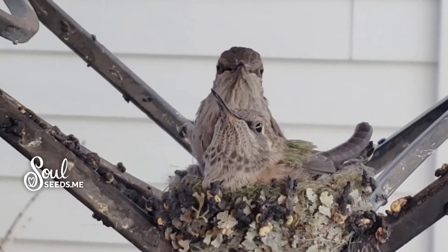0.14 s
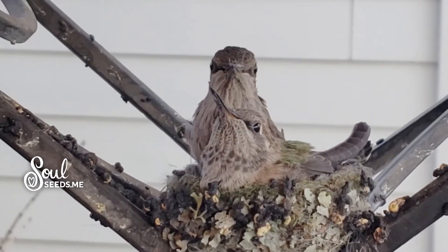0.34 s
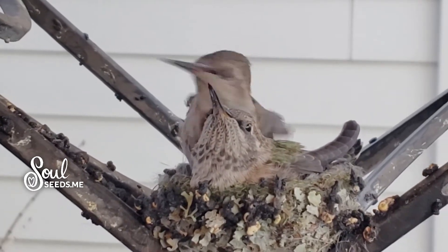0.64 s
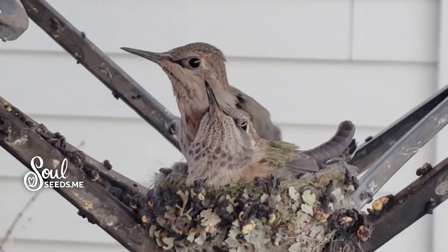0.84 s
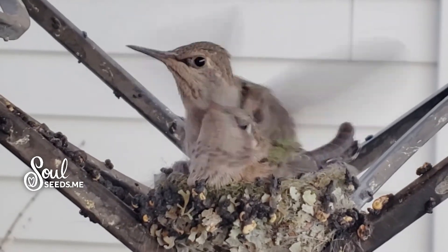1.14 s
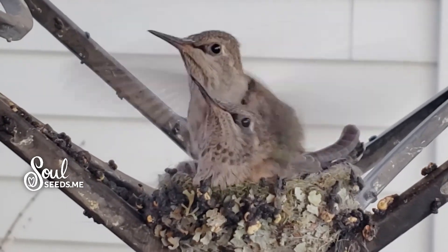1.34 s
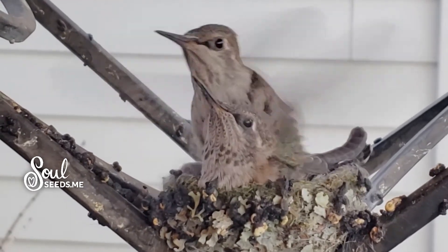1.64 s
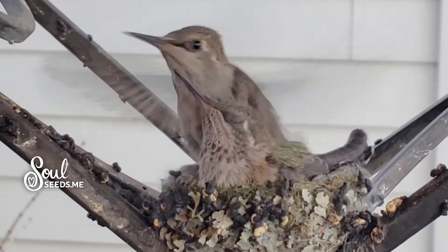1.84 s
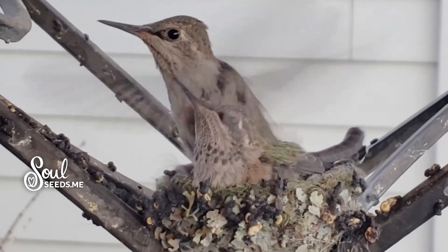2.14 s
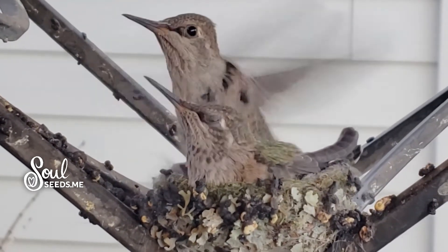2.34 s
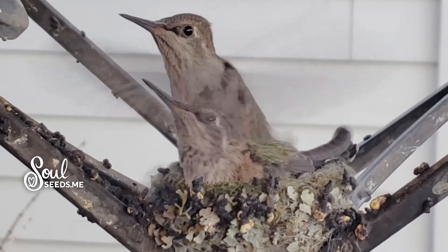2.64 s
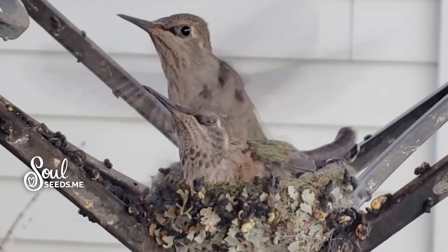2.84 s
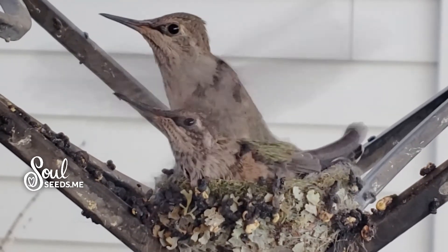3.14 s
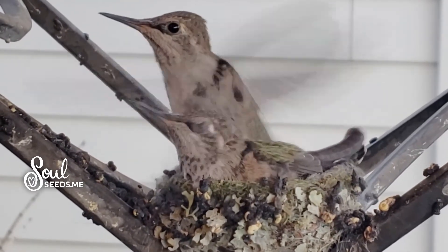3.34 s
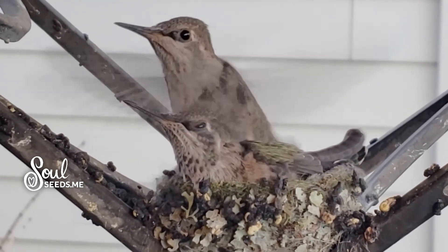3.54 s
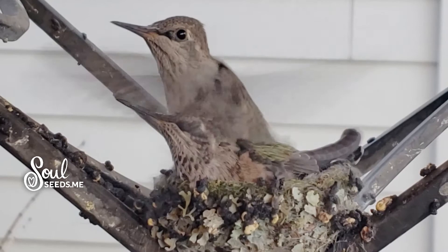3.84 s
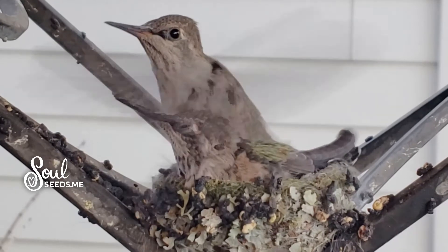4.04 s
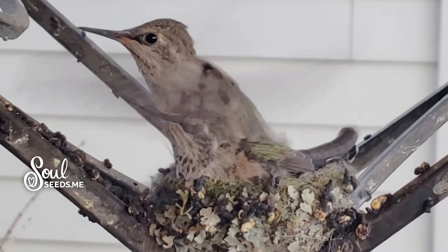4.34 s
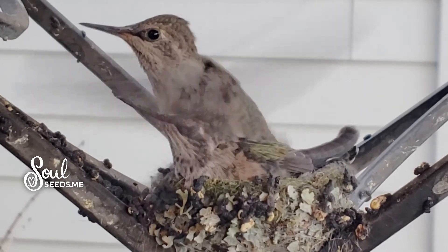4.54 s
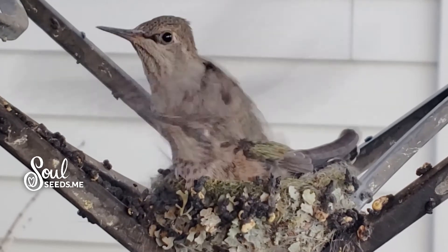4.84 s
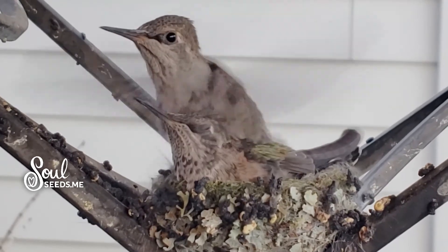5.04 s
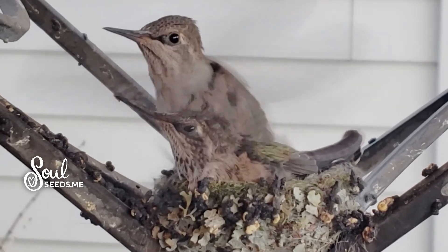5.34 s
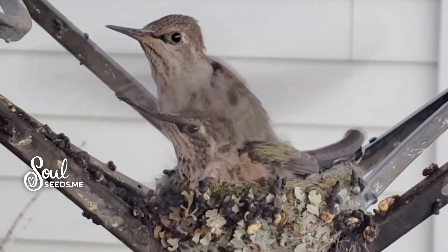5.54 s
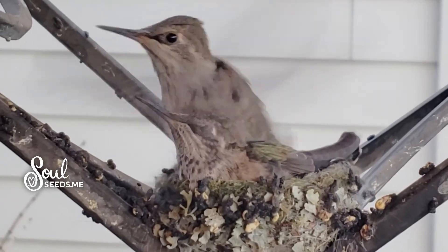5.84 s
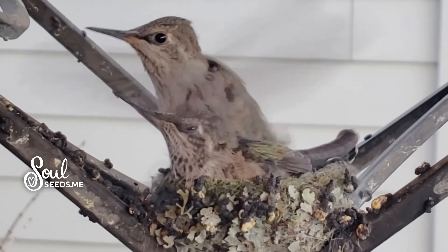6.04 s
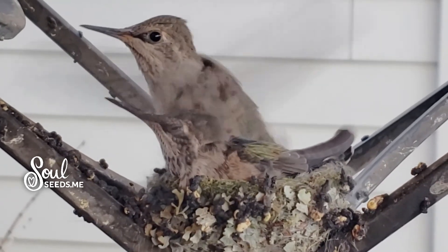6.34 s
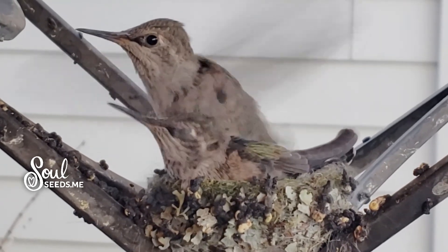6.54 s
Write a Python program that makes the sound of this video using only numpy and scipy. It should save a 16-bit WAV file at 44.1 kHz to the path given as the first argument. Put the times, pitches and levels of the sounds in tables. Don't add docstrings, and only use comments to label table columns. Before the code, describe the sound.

A quiet outdoor stereo scene beside a house wall, heard about a metre from a nest. Soft low town noise and a wavering fan hum run throughout. Two weak, tiny chirps come at 0.2 and 0.7 seconds, while a distant songbird whistles three descending notes from 0.8 to 1.2. From about 1.05 a chick's wings start a low purring whir, roughly forty beats a second, with faint airy hiss, lasting to the end. Brighter millisecond-short chirps, dropping steeply from very high, come paired at 1.7, near 2.2 and 2.75, then singly at 3.5, 4.2, 4.8 and 5.9. Dry bill ticks and shuffling cluster from 2.7 to 3.6; sharper ticks come at 4.9, 5.8 and 6.6. Bassy wind thumps are strongest at 3.2-3.8, mainly right, as a far vehicle's noise swells gently. A faint motor whine rises at 4.9-5.2. Chirps carry a short wall echo.

```python
import sys
import numpy as np
from scipy import signal
from scipy.fft import rfft, irfft
from scipy.io import wavfile
from scipy.ndimage import uniform_filter1d

SR = 44100
rng = np.random.default_rng(int(sys.argv[2]) if len(sys.argv) > 2 else 0)


def master_out(mix):
    frames = np.transpose(np.atleast_2d(mix))
    ceiling = np.clip(frames, -1, 1)
    pcm = np.round(ceiling * 32767).astype(np.int16)
    wavfile.write(sys.argv[1], SR, pcm)


def invert_db(level):
    return 10 ** (np.asarray(level, dtype=float) / 20)


N = 294588
TIME = np.arange(N) / SR
FREQ = np.maximum(np.fft.rfftfreq(N, 1 / SR), 1)

# (frequency [Hz], density [dB per Hz])
TOWN_SPECTRUM = [(25, -19.5), (50, -11.5), (110, -5.5), (260, -13.5), (400, -18), (780, -21), (1100, -37),
                 (1800, -35), (2150, -45), (2800, -41), (3500, -44), (8500, -51), (13000, -48.5),
                 (16000, -52)]
TOWN_DB = -62
# (frequency [Hz], likeness [0-1])
PORT_LIKENESS = [(60, 1), (300, 0.51), (700, 0.07), (1500, 0), (3000, 0.03), (7000, 0.15), (15000, .01)]
# (frequency [Hz], left minus right [dB])
PORT_TILT = [(60, -10.5), (110, -7.5), (200, -9.5), (380, -7), (700, -0.5), (1290, -6.0), (2380, -11),
             (4400, -2), (8120, -3.5), (15000, -9.5)]
# (frequency [Hz], level [dB])
FAN_LINES = [(59.2, -63), (107.7, -61), (193.8, -69), (215.3, -65.5), (249, -67.5), (301.5, -74),
             (345, -75), (409.1, -79)]
TRAFFIC_S, TRAFFIC_WIDTH_S, TRAFFIC_DB, QUIET_DB = 3.14, 1.1, 5, -1
# (time [s], width [s], low-mid lift [dB], mid lift [dB])
SCUFFLES = [
    (2.92, 0.11, -0.5, 6.5),
    (3.48, 0.13, 2, 5),
]

# (middle [s], length [s], level [dB], left minus right [dB])
GUSTS = [
    (0.147, 0.29, -52, 7),
    (1.46, 0.39, -49.5, -16),
    (1.679, 0.14, -44.5, -1),
    (3.486, 0.58, -39.5, -18.5),
    (4.356, 0.23, -50, -4),
    (5.035, 0.32, -47.5, -1),
    (5.85, 0.57, -53, -6),
    (6.6, 0.33, -48, 2),
]
CALM_DB, CALM_PAN_DB, GUST_EDGE_S = -61, -5, .06
# (time [s], level [dB], frequency [Hz], port [0 left, 1 right])
BUFFETS = [(0.101, -41.5, 56, 1), (0.266, -38.5, 68, 1), (0.851, -39, 73.4, 1), (1.12, -37.5, 75, 1),
           (1.376, -35, 76, 1), (1.47, -34, 71.5, 1), (1.584, -34.5, 76, 1), (1.586, -38.5, 55.6, 0),
           (1.694, -41, 78, 1), (1.695, -38.5, 77.5, 0), (3.174, -37, 91, 1), (3.206, -41, 58.5, 1),
           (3.311, -25, 88.9, 1), (3.366, -22, 50.6, 1), (3.4, -25, 73, 1), (3.465, -23, 58.6, 1),
           (3.501, -26, 90, 1), (3.561, -20, 68.5, 1), (3.682, -23.5, 86, 1), (3.76, -32.5, 62.1, 1),
           (4.376, -45, 66.26, 0), (5.059, -37.5, 89, 1), (5.293, -35.5, 62.6, 1), (5.399, -37.5, 75, 0),
           (5.644, -32, 77.34, 1), (5.843, -34, 64, 1), (6.304, -38, 66.6, 1), (6.354, -38.5, 52.5, 1),
           (6.52, -45, 65.6, 0)]

# (time of bend [s], held pitch [Hz], hold [ms], fall [Hz per ms], level [dB])
CHIRPS = [(0.176, 6160, 3.9, 990, -54), (0.742, 6830, 3.1, 850, -51), (1.7027, 8680, 8.2, 964, -39.5),
          (1.78, 8120, 6.9, 733, -40), (2.175, 7540, 6.4, 647, -45.5), (2.2603, 7630, 4.55, 730, -40),
          (2.7241, 8100, 6.9, 729.5, -35.5), (2.8031, 8373, 5.4, 755, -35), (3.5117, 8400, 6.5, 920, -33.5),
          (4.182, 8690, 8.5, 901, -35), (4.7973, 8700, 6.7, 926, -35), (5.8943, 8732, 5.8, 930, -32.5)]
BEND_MS, SWELL_DB, FADE_DB_PER_MS, CHIRP_END_HZ = 1.118, 17, 2.33, 1680
OCTAVE_DB, RASP = -11, .17
OCTAVE_END_HZ, OCTAVE_FADE_HZ = 4000, 1390
CHIRP_PAN_DB, PAN_PER_DB = 1.2, -0.03
# (time [s], ring [dB], knock and treble against the ring [dB], left minus right [dB])
SNAPS = [(0.176, -65.5, -4, 3), (0.742, -67, -9, 7), (3.5125, -52, -1.5, 0.5), (2.0252, -59, -23, 0),
         (2.3547, -72, -7, -3), (2.6663, -42.5, -13, 6), (2.7979, -39.5, -24.5, 0), (2.902, -70, 6, -2),
         (2.9275, -60, 2, 5), (2.9536, -47.5, 1, 5.5), (2.982, -56.5, 1, 9), (3.379, -55, 11, 5.5),
         (3.4057, -54, 13, 1.5), (3.4186, -57.5, 1, 21), (3.4335, -53, -15, 13), (3.4594, -55, -5, 7),
         (3.5407, -54, -8, 3), (3.621, -49, -12, 8), (3.649, -65.5, 0, -1), (4.1345, -81, -4, 0),
         (4.8997, -30.5, -40.5, 8), (5.7335, -59, -13, 6), (5.7604, -42.5, -35, 4.5), (5.8709, -35, -27, 7),
         (6.4722, -64, -8, 6), (6.5843, -26, -55, 7), (6.598, -73, -12, -1)]
# (frequency [Hz], bandwidth [Hz], level [dB])
BILL_MODES = [(2580, 1300, -56), (5200, 2800, -2), (8470, 610, 9), (11400, 7200, 24.5), (16000, 1300, -10)]
TREBLE_DB, TREBLE_PER_BREADTH = -2, 0.56
# (delay [ms], level [dB])
ECHOES = [(4.3, -13), (9.5, -18), (15, -21)]
# (frequency [Hz], decay time t60 [s], level [dB])
YARD = [(1240, 0.44, -19.5), (2680, 0.25, -11.5), (4580, 0.3, -19), (7300, 0.29, -28), (12400, 0.23, -6)]
FAR_WET_DB, SNAP_WET_DB = -2, -5

# (time [s], frequency [Hz], level [dB])
SONG = [
    [(.77, 4850, -80), (.80, 4700, -70), (.825, 4580, -65), (.85, 4480, -71), (.89, 4400, -86)],
    [(.862, 7830, -92), (.872, 7000, -75), (.885, 6250, -71), (.9, 5750, -72), (.92, 5350, -73),
     (.95, 5000, -72), (.975, 4850, -75), (1.0, 4750, -88)],
    [(1.008, 4530, -80), (1.04, 4490, -71), (1.1, 4400, -65), (1.185, 4240, -66), (1.2, 4220, -78),
     (1.215, 4190, -77), (1.23, 4170, -92)],
]
SONG_ROUGH = [.92, .7, .15]

# (time [s], beat rate [beats per s], level [dB])
WING = [(1.05, 43, -71), (1.2, 43.2, -60), (1.5, 42.5, -58), (1.85, 40.2, -52.5), (2.1, 39.6, -50),
        (2.7, 38.6, -52), (3.2, 37.6, -52.5), (3.9, 35.9, -54), (4.15, 35.8, -57.5), (4.5, 35.8, -53.5),
        (5.4, 35.7, -56.5), (6.0, 36, -53), (6.68, 34.4, -54)]
# (multiple [-], level [dB])
STROKE = [(1, -10), (2, -1), (3, 0), (4, -14), (5, -11), (6, -14), (7, -17), (8, -16), (9, -15), (10, -21),
          (11, -24), (12, -23)]
REST_DB = -75
FEATHER_DB, FEATHER_PER_DB, STIR_PER_DB = -88.5, 0.6165, 0.224

# (time [s], frequency [Hz], level [dB])
PASSER = [(4.88, 750, -90), (4.92, 770, -71), (5.0, 800, -73), (5.1, 840, -78), (5.2, 870, -92)]
# (frequency [Hz], left [dB], right [dB], left lag [rad])
PORTS = [(800, 1, 2, .05), (1500, -4, 2, .1), (2200, -11, -2, .05), (3200, -5, -4, .2), (5000, 3, 2, .5),
         (6400, -2.5, -3.5, .8), (7700, 3, 2, 1.5), (8600, -3, -3, 1.8), (9600, -4, -1, 2.2),
         (12000, -2, 1, 2.1), (15500, -2, 0, 2.4)]


def curve(rows, column):
    rows = np.array(rows, float)
    return np.interp(TIME, rows[:, 0], rows[:, column])


def shape(rows, column=1):
    rows = np.array(rows, float)
    return np.interp(np.log(FREQ), np.log(rows[:, 0]), rows[:, column])


def band(hz, octaves):
    return np.exp(-.5 * (np.log2(FREQ / hz) / octaves) ** 2)


def noise(gain):
    x = irfft(rfft(rng.standard_normal(N)) * gain, N)
    return x / x.std()


def walk(rate_hz):
    return noise(1 / (1 + (FREQ / rate_hz) ** 2))


def bump(s, width_s):
    return np.exp(-.5 * ((TIME - s) / width_s) ** 2)


def place(x, pan_db):
    return np.array([x * invert_db(pan_db / 2), x * invert_db(-pan_db / 2)])


def swells():
    low = QUIET_DB + TRAFFIC_DB * bump(TRAFFIC_S, TRAFFIC_WIDTH_S)
    mid = STIR_PER_DB * (curve(WING, 2) - REST_DB)
    for s, width_s, low_db, mid_db in SCUFFLES:
        shuffle = bump(s, width_s)
        low = low + low_db * shuffle
        mid = mid + mid_db * shuffle
    return low, mid


def town_noise():
    like = np.clip(shape(PORT_LIKENESS), 0, 1)
    colour = invert_db(shape(TOWN_SPECTRUM))
    unit = invert_db(TOWN_DB) / np.sqrt(np.sum(colour[FREQ > 150] ** 2))
    low_swell, mid_swell = swells()
    centres = 30 * 2. ** np.arange(10)
    share = np.array([band(hz, 0.5) ** 2 for hz in centres])
    out = 0
    for hz, part in zip(centres, np.sqrt(share / share.sum(0))):
        pair = []
        for sign in (1, -1):
            gain = colour * part * np.sqrt((1 + sign * like) / 2 + 1e-9)
            pair.append(np.sqrt(np.sum(gain ** 2)) * noise(gain))
        mid, side = pair
        swell = mid_swell if hz > 1000 else low_swell
        drift_db = swell * (200 < hz < 3000) + 1.36 * walk(7.5)
        out = out + unit * invert_db(drift_db) * np.array([mid + side, mid - side])
    tilt = invert_db(shape(PORT_TILT) * np.array([[.5], [-.5]]))
    return irfft(rfft(out) * tilt, N)


def fan_hum():
    hum = 0
    for hz, db in FAN_LINES:
        level = np.sqrt(2) * invert_db(db + 2.3 * walk(2.5))
        turns = hz * np.cumsum(1 + .003 * walk(2.5)) / SR
        hum = hum + level * np.sin(2 * np.pi * turns)
    return place(hum, -0.52)


def gusts():
    side = np.array([[.5], [-.5]])
    power = invert_db(CALM_DB + side * CALM_PAN_DB) ** 2
    for s, length_s, db, pan_db in GUSTS:
        gate = np.clip((length_s / 2 - np.abs(TIME - s)) / GUST_EDGE_S + .5, 0, 1)
        power = power + (invert_db(db + side * pan_db) * gate ** 2) ** 2
    return np.sqrt(power)


def breeze():
    rumble = [noise(band(42.2, 0.62)) * gain * invert_db(0.84 * walk(26) - 4.0) for gain in gusts()]
    out = np.array(rumble)
    flutter = noise(band(139.0, 0.42))
    t = np.arange(-3000, 3000) / SR
    chance = rng.uniform(-0.71, 1, (len(BUFFETS), 2))
    for (s, db, hz, port), (turn, edge) in zip(BUFFETS, chance):
        i = int(s * SR) - 3000
        slap = np.cos(2 * np.pi * hz * t * (1 + 0.41 * edge * hz * t) + 1.1 * turn)
        slap += invert_db(-14.0 + 0.091 * (db + 32.5)) * flutter[i:i + len(t)]
        out[int(port > .5), i:i + len(t)] += invert_db(db) * slap * np.exp(-.5 * (t * hz / 0.81) ** 2)
    return out


def chirps():
    out = np.zeros((2, N))
    ms = np.arange(-600, 700) / SR * 1000
    rasp = 1 + RASP * walk(2100)
    for s, top_hz, hold, fall, db in CHIRPS:
        hz = top_hz - fall * BEND_MS * np.logaddexp(0, ms / BEND_MS)
        hz = hz - 250 * np.exp(-(ms + hold) / 0.95).clip(0, 2)
        hz = CHIRP_END_HZ + 600 * np.logaddexp(0, (hz - CHIRP_END_HZ) / 600)
        swell_db = SWELL_DB * (ms - 1.2) / (hold + 3.3)
        fade_db = -FADE_DB_PER_MS * (ms - 1.2)
        level_db = db + np.minimum(swell_db, fade_db)
        gate = np.clip((ms + hold) / 2.9, 0, 1) * np.clip((hz - CHIRP_END_HZ - 150) / 500, 0, 1)
        envelope = uniform_filter1d(gate * invert_db(level_db), size=30)
        phase = 2 * np.pi * np.cumsum(hz) / SR
        octave = invert_db(OCTAVE_DB) * np.clip((hz - OCTAVE_END_HZ) / OCTAVE_FADE_HZ, .15, 1)
        i = int(s * SR) - 600
        tone = (np.sin(phase) + octave * np.sin(2 * phase + 1)) * rasp[i:i + len(ms)]
        pan_db = CHIRP_PAN_DB + PAN_PER_DB * (db + 47)
        out[:, i:i + len(ms)] += place(envelope * tone, pan_db)
    return out


def snaps():
    out = np.zeros((2, N))
    t = np.arange(400) / SR
    chance = rng.standard_normal((len(SNAPS), 2 * len(BILL_MODES)))
    for (s, db, knock_db, pan_db), z in zip(SNAPS, chance):
        treble_db = TREBLE_DB + TREBLE_PER_BREADTH * knock_db
        ring = 0
        for k, (hz, width_hz, mode_db) in enumerate(BILL_MODES):
            level = invert_db(mode_db + 0.41 * z[k] + treble_db * (hz > 7000))
            mode_hz = hz * (1 + 0.078 * z[-1 - k])
            ring = ring + level * np.exp(-np.pi * width_hz * t) * np.sin(2 * np.pi * mode_hz * t)
        thud = (1 - np.exp(-t / 0.00004)) ** 2 * np.exp(-t / 0.00031) * np.cos(2 * np.pi * 700 * t)
        knock = invert_db(knock_db + 7.0) * thud
        i = int((s + .001) * SR)
        out[:, i:i + len(t)] += place(invert_db(db + 3) * (ring + knock), pan_db - 10)
    return out


def echoes(x):
    out = 0
    for ms, db in ECHOES:
        left = np.roll(x[0], int(ms * SR / 1000))
        right = np.roll(x[1], int(ms * SR / 990))
        out = out + invert_db(db) * np.array([left, right])
    return out


def yard(x, wet_db):
    t = TIME[:SR // 2]
    tails = np.zeros((2, len(t)))
    for hz, t60, db in YARD:
        patchy = walk(180)[:2 * len(t)].reshape(tails.shape)
        wash = noise(band(hz, 0.39))[:2 * len(t)].reshape(tails.shape)
        decay = invert_db(-60 * t / t60) * np.clip(t / 0.0044, 0, 1)
        tails += invert_db(db - 24.5 + 2.04 * patchy) * wash * decay
    return invert_db(wet_db) * signal.fftconvolve(x, tails, axes=1)[:, :N]


def songbird():
    out = 0
    for note, rough in zip(SONG, SONG_ROUGH):
        sounding = 1. * (TIME > note[0][0]) * (TIME < note[-1][0])
        gate = uniform_filter1d(sounding, size=300)
        flutter = np.sqrt(1 - rough ** 2) + rough * walk(160)
        whistle = np.sin(2 * np.pi * np.cumsum(curve(note, 1)) / SR)
        out = out + np.sqrt(2) * gate * invert_db(curve(note, 2)) * flutter * whistle
    return out


def wings():
    phase = 2 * np.pi * np.cumsum(curve(WING, 1) * (1 + .004 * walk(3))) / SR
    effort_db = curve(WING, 2)
    since_start = TIME - WING[0][0]
    whir = sum(invert_db(db + 3.34 * walk(2.1)) * np.cos(k * phase - 0.922 * k) for k, db in STROKE)
    whir = whir * invert_db(effort_db - 0.24) * np.clip(since_start * 20, 0, 1)
    stroke = 1 + 0.32 * np.cos(phase) * np.clip(since_start * 5, 0, 1)
    colour = band(16160, 0.27) + invert_db(-5) * band(7440, 0.06) + invert_db(-11.5) * band(10000, .3)
    feather = stroke * invert_db(FEATHER_DB + FEATHER_PER_DB * (effort_db - REST_DB) + 0.5)
    hiss = np.array([noise(colour) * feather for _ in range(2)])
    return place(whir, 0.04) + hiss * invert_db(np.array([[-1.5], [1.5]]))


def passer():
    level = invert_db(curve(PASSER, 2) + 2 * walk(25))
    return level * np.sin(2 * np.pi * np.cumsum(curve(PASSER, 1)) / SR)


def ports(x):
    left_db, right_db, lag = (shape(PORTS, column=c) for c in (1, 2, 3))
    cepstrum = irfft(np.log(invert_db(right_db)), N)
    cepstrum[1:N // 2] *= 2
    cepstrum[N // 2 + 1:] = 0
    right = np.exp(rfft(cepstrum))
    left = right * invert_db(left_db - right_db) * np.exp(-1j * lag)
    return irfft(rfft(x) * np.array([left, right]), N)


def scene():
    beds = town_noise() + fan_hum() + breeze()
    calls, clicks = chirps(), snaps()
    far = place(invert_db(1.0) * songbird(), .1)
    sent = calls + invert_db(SNAP_WET_DB) * clicks + invert_db(FAR_WET_DB) * far
    voices = calls + echoes(calls) + clicks + far + yard(sent, wet_db=-1.5)
    return ports(voices) + wings() + beds + place(passer(), -8.0)


def band_limit(x):
    return signal.sosfilt(signal.butter(12, 16670, fs=SR, output="sos"), x)


def record(dry):
    low_cut = signal.butter(2, 37, "highpass", fs=SR, output="sos")
    top_cut = signal.ellip(7, .5, 28, 15800, fs=SR, output="sos")
    mix = signal.sosfilt(np.vstack([low_cut, top_cut]), dry)
    return band_limit(mix)


dry = scene()
out = record(dry)
master_out(out)
```